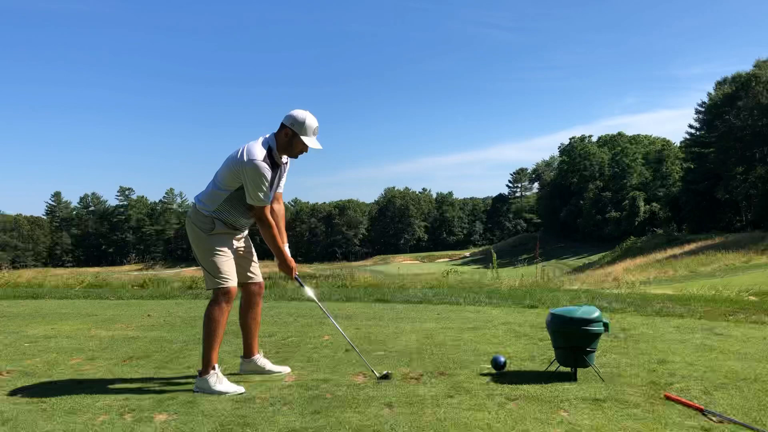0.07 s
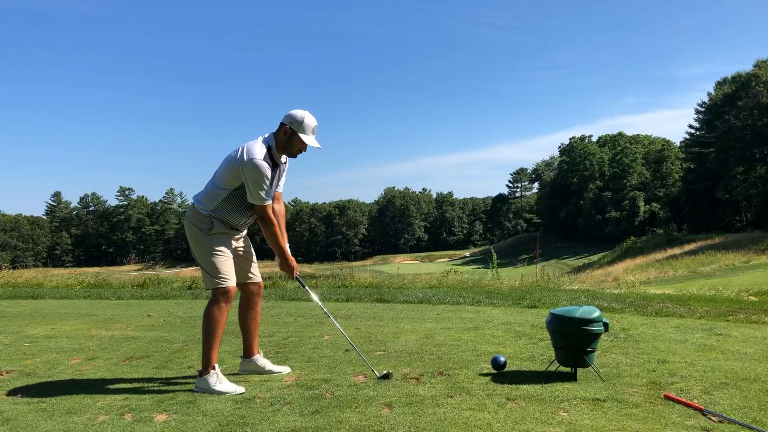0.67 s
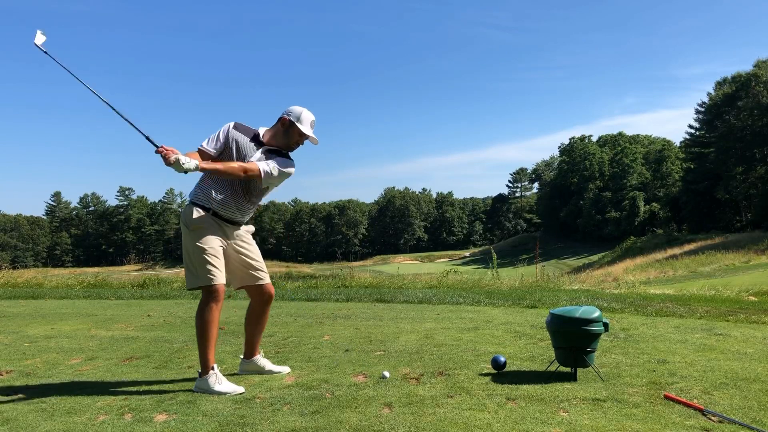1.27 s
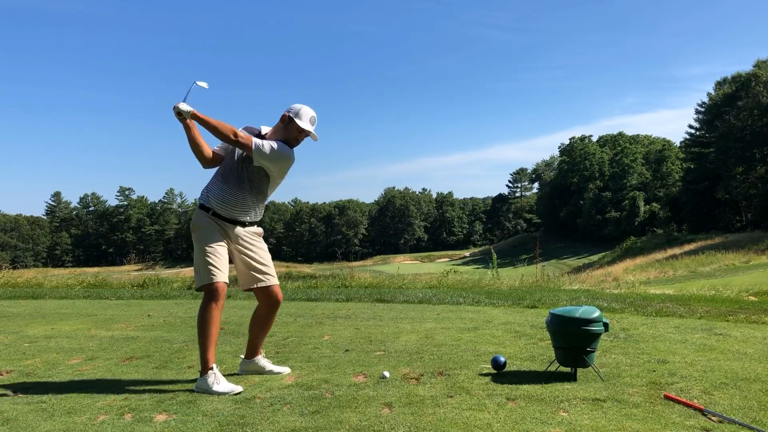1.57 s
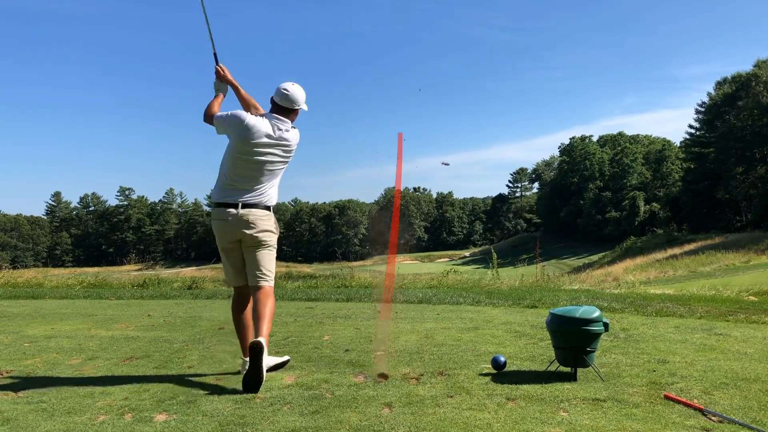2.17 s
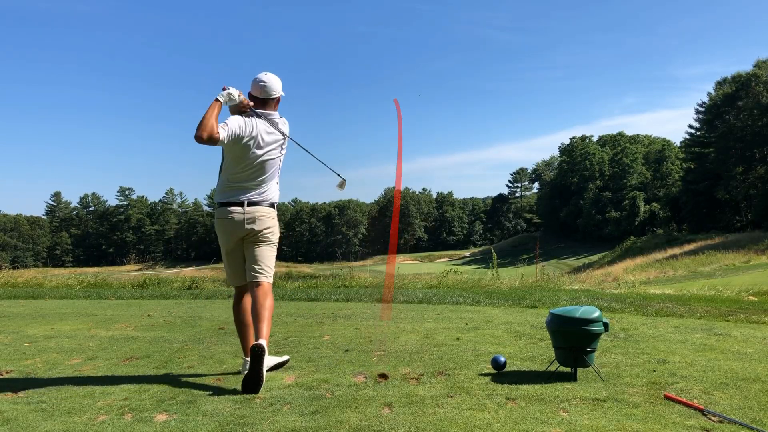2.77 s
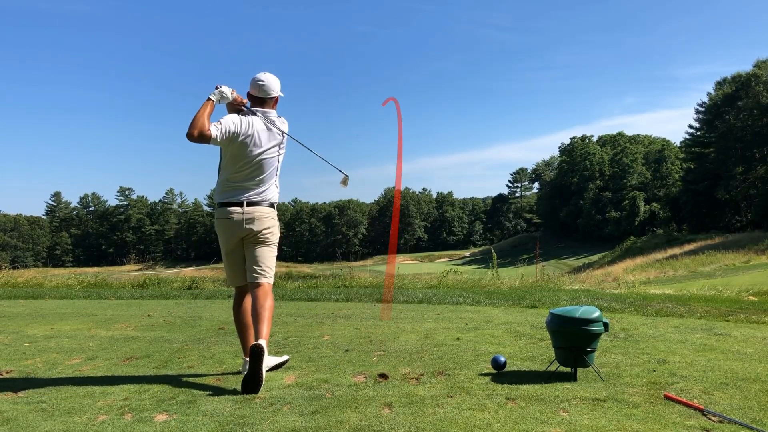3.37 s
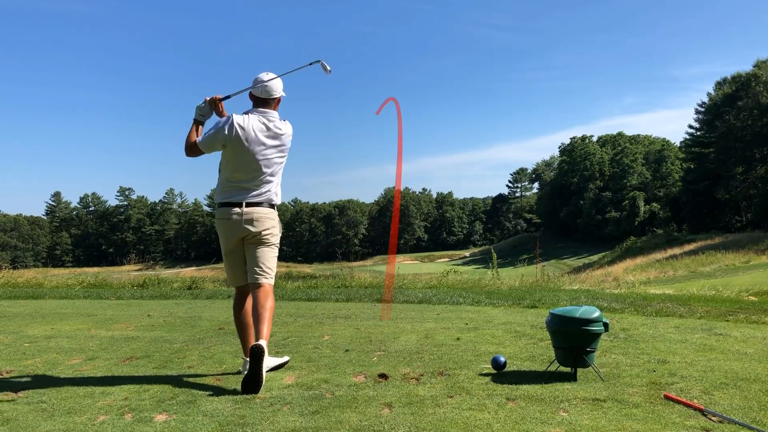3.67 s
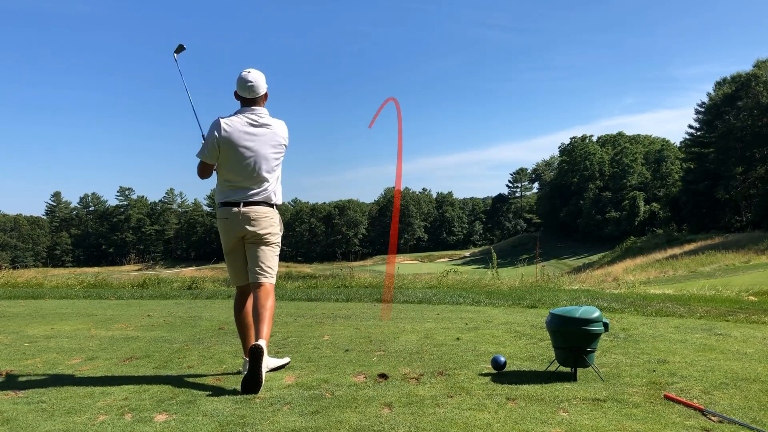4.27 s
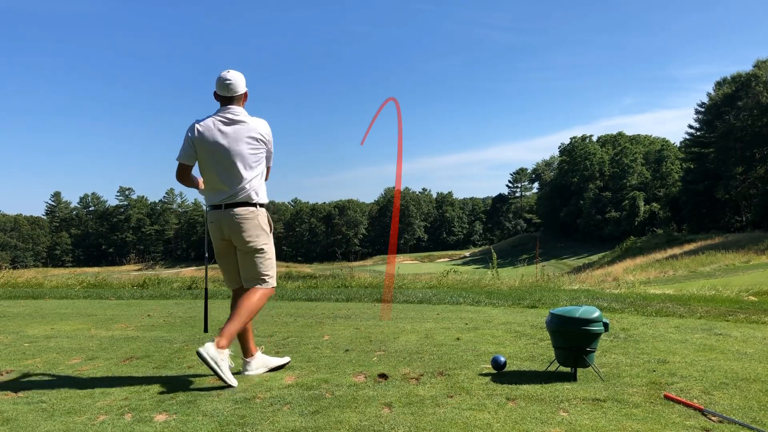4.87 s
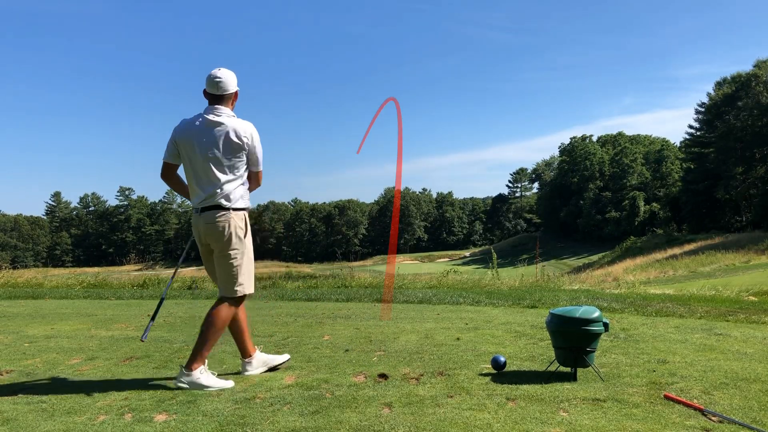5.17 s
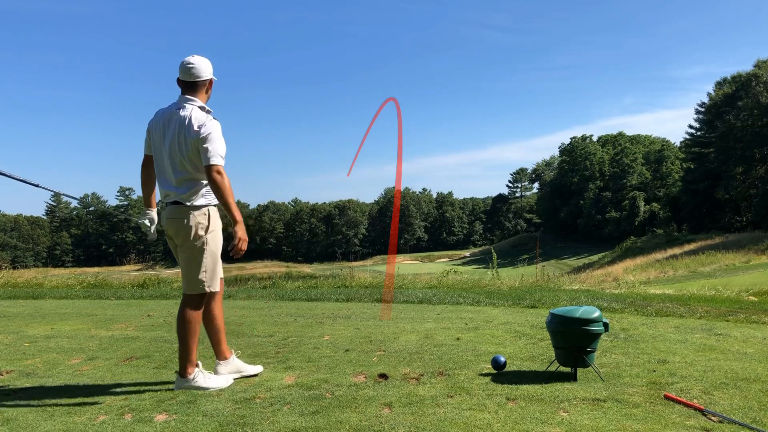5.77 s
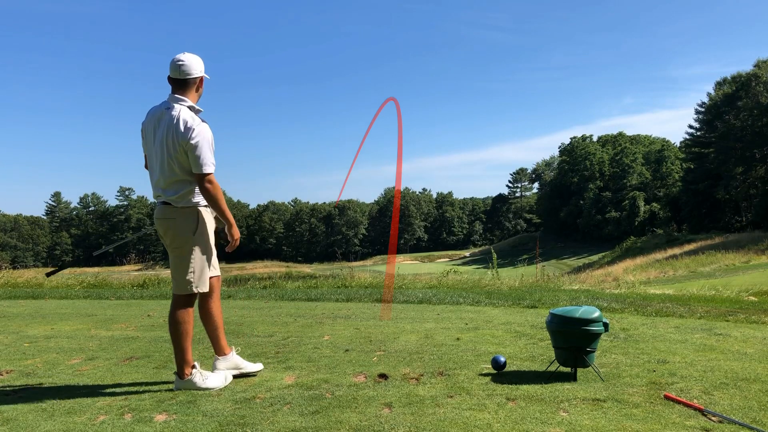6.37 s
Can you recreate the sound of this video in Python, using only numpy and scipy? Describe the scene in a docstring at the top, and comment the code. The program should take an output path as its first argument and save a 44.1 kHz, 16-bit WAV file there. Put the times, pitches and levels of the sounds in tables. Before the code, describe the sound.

A light, low wind rumble on the microphone runs throughout at an outdoor golf tee, with a soft hush of leaves, a faint wavering hum from a distant mower and a barely audible high insect trill. Clothes rustle faintly from about 1.4 seconds. At 2 seconds an iron swishes quickly through the air and, just before 2.1 seconds, hits the ball with one sharp, bright crack and a low thump of tearing turf, by far the loudest moment. Grass and sand spray briefly, a few crumbs of soil tick down around 2.4 seconds, and a soft echo from the slopes and trees fades by about 3 seconds. Quiet clothing rustle follows, with a muffled step, scuff and small clicks near 4.4 seconds and another soft step near 6.3 seconds. Faint, distant birds call around 1.3 seconds and now and then from 5 seconds until the end, at about 6.5 seconds.

```python
"""A light wind rumbles first, with a far mower, birds, leaves and a thin insect trill around a golf tee.
About two seconds in, a golfer swings an iron: the shaft swishes through the air, the club face cracks
on the ball and the ground thumps as the blade tears the turf. Grass and sand spray, and the slopes and
the tree line answer with an echo. Then clothes rustle and feet shift as the golfer steps back."""
import sys
import numpy as np
from scipy import signal
from scipy.fft import rfft, irfft, next_fast_len
from scipy.io import wavfile

SR = 44100
rng = np.random.default_rng(int(sys.argv[2]) if len(sys.argv) > 2 else 0)


def output_pcm(signal):
    """Save a mono or channel-first signal as 16-bit PCM at the path in sys.argv[1].

    Samples are clipped to [-1, 1] before scaling.
    """
    pcm = np.clip(np.atleast_2d(signal).T, -1, 1) * 32767
    wavfile.write(sys.argv[1], SR, np.round(pcm).astype(np.int16))


N = 287091
TIME = np.arange(N) / SR
# when the blade meets the turf, the face meets the ball and the ground gives way
BITE_S, SMACK_S, THUMP_S = 2.066806, 2.069477, 2.0705
# A "rise" or "fall" is the time a level takes to change by 20 dB. A "colour" is the tone of a noise.

# colours of wind rumble, low flutter, and far land and leaves: (frequency [Hz], relative level [dB])
RUMBLE_COLOUR = [(20, -36), (35, -20), (55, 0.5), (75, 1), (110, -.5), (165, -6), (230, -18), (400, -32.5),
                 (1500, -70)]
FLUTTER_COLOUR = [(80, -20), (165, 3), (260, -3), (360, -4), (600, -15), (1500, -24), (5000, -50)]
HUSH_COLOUR = [(120, -31), (200, -2), (273, -4.5), (373, -6), (647, -9), (709, -8.5), (1100, -9.5),
               (2650, -22), (7830, -30.5), (8900, -32), (14600, -35.5), (16000, -48.5)]
# low flutter from wind gusts and, at 4.44 s and 6.33 s, from the golfer moving:
# (peak time [s], level [dB], rise [s])
FLUTTER_SWELLS = [(.15, -64, 0.67), (.75, -69, .4), (1.08, -60, .32), (1.29, -57.5, 0.19),
                  (1.71, -58.5, 0.26), (2.4, -71, .4), (4.44, -70, 0.17), (6.33, -64, .1)]
# steady tones of the mower: (multiple of the engine pitch, level [dB], waver [dB])
MOWER_TONES = [(.494, -71, 4), (1, -71, 1.8), (1.47, -83, 3), (3.31, -82, 3), (4.01, -85, 3)]
# the mower's tone one octave up, which comes and goes: (time [s], level [dB])
MOWER_OCTAVE = [(0, -78), (0.7, -80), (1.2, -72), (1.45, -78.5), (2.3, -71), (3.6, -73.5), (4.07, -82),
                (4.4, -71.5), (4.85, -76), (5.0, -71.5), (5.7, -70.5), (5.95, -77), (6.1, -72), (6.51, -74)]
# far bird calls, plus one long, soft, high rustle of leaves at 3.35 s:
# (time [s], length [s], start pitch [Hz], end pitch [Hz], blur [Hz], level [dB])
BIRDS_AND_LEAVES = [(1.21, 0.081, 2260, 2170, 60, -79), (1.31, .065, 2210, 2130, 60, -76),
                    (3.351, 0.77, 4210, 4090, 1200, -80.5), (4.88, 0.27, 2890, 2810, 500, -79),
                    (5.04, 0.26, 2600, 2520, 450, -77.5), (5.365, 0.033, 3750, 3620, 300, -76.5),
                    (5.69, 0.085, 3900, 3700, 700, -78), (6.264, .03, 4850, 4800, 160, -73),
                    (6.285, .04, 4750, 4600, 250, -77), (6.379, .04, 2300, 2200, 300, -71),
                    (6.44, .05, 2400, 2250, 500, -74), (6.493, 0.033, 4900, 5150, 800, -67.5)]

# body turns, scuffs of sleeves and soles, and steps on turf: (peak time [s], level [dB], rise [s])
TURNS = [(1.4, -74, 0.54), (1.98, -73, .3), (2.6, -77.5, 0.83), (3.25, -79.5, 0.89), (3.75, -85, .6),
         (4.45, -79, .25), (4.98, -76.5, 0.46), (5.48, -76.5, 0.18), (5.76, -81, .4), (6.12, -78.5, 0.71),
         (6.51, -71, 0.22)]
SCUFFS = [(1.635, -67, 0.068), (3.6, -81, 0.49), (4.43, -67, 0.08), (5.28, -75, 0.78), (6.325, -64, 0.097),
          (6.46, -68.5, 0.18)]
TREADS = [(4.415, -65, .06), (4.49, -66, .05), (6.322, -59.5, 0.035)]
# colours of rustling cloth, dull scuffs and muffled steps: (frequency [Hz], relative level [dB])
CLOTH_COLOUR = [(500, -2), (1500, -1), (3500, 0.5), (5500, -3.5), (8000, -4), (12000, -7), (16000, -12)]
SCUFF_COLOUR = [(300, 0), (600, -3), (950, 1.5), (1700, -4), (2250, -6.5), (2700, -12), (3200, -7),
                (4700, -10.5), (5600, -20.5), (12000, -32.5)]
TREAD_COLOUR = [(200, 5), (400, -7), (950, -2), (1400, -12), (3000, -26), (9000, -45)]
# soft bumps of loose turf, hands and heel: (time [s], pitch [Hz], level [dB], time to peak [s])
BUMPS = [(2.092, 69, -36.5, 0.012), (2.089, 225, -44, .008), (2.072, 48, -39, .011),
         (2.073, 305, -41, 0.0075), (2.121, 140, -46, 0.01), (4.39, 194, -58.5, .025),
         (4.44, 200, -55.5, .02), (6.30, 149, -52.5, 0.024), (6.305, 222, -50.5, 0.019)]
# soil crumbs landing, ticks of shoe and grip: (time [s], level [dB], pitch [Hz], time to fade 60 dB [s])
TICKS = [(1.879, -59, 9450, 0.024), (2.284, -64.5, 12050, 0.0087), (2.326, -62, 12980, 0.0081),
         (2.355, -59, 12000, .008), (2.4063, -49, 7900, 0.009), (2.411, -66, 9000, .02),
         (2.417, -59.5, 9000, .008), (3.239, -66.5, 8500, .04), (4.431, -58, 2300, .018),
         (4.456, -59, 5800, .04), (4.463, -64, 10000, .08), (4.467, -59, 5500, .02),
         (4.472, -54.5, 6800, .015), (4.475, -53, 3320, 0.018), (4.4903, -50, 1960, 0.011),
         (4.491, -56, 3000, .01), (4.533, -66.5, 12500, .05), (4.542, -62, 10500, .025),
         (4.552, -63, 12000, .014), (4.732, -62, 7460, .1), (5.036, -64, 3600, 0.04)]

# echoes from the near slopes, then the tree line: (delay [s], level [dB], rise [s], hold [s], fall [s])
ECHOES = [(.06, -55.5, .08, 0.079, 0.14), (.24, -64, .2, 0.033, 0.74)]
# colours of the echoes, fine grass shreds and flying soil: (frequency [Hz], relative level [dB])
ECHO_COLOUR = [(200, -3.5), (450, -4), (900, -.5), (1450, 0), (2200, -3.5), (2750, -7), (3600, -5.5),
               (7000, -18), (16000, -29)]
SHREDS_COLOUR = [(7000, -4), (9400, 1), (12000, -3), (16000, -5)]
SPRAY_COLOUR = [(190, 5), (300, 1.5), (480, -16), (1000, -11), (1500, -5), (2300, -4.5), (2750, -9.5),
                (3500, -2), (5000, -3), (6500, -6), (8000, -12), (9500, -11), (12000, -18), (16000, -23.5)]
# colours of the air behind shaft and head, and of tearing grass: (frequency [Hz], relative level [dB])
SHAFT_WAKE_COLOUR = [(600, -6), (950, 0), (1700, -8), (4000, -25), (12000, -36)]
HEAD_WAKE_COLOUR = [(200, -1), (700, 2), (1500, -1), (2200, -4), (4000, -5.5), (6000, -11), (9000, -14),
                    (12500, -20.5), (16000, -26.5)]
TEAR_COLOUR = [(300, 0), (700, 1), (1500, 1), (2400, -1), (4000, -3), (5500, 1), (7600, -3), (10000, 0),
               (13500, -3), (16000, -5)]
# hollow knock of head and ball, bright smack of the face and faint after-ring of the steel:
# (pitch [Hz], level [dB], time to peak [s])
KNOCK_TONES = [(465, -25.4, .00428), (715, -29.5, .0042), (870, -22.2, .00332), (1244, -23.9, .00354),
               (1556, -27.7, .00378), (1752, -21.8, .00272), (2145, -22.0, .00326), (2957, -18.7, .00213),
               (3298, -25.2, .0036), (3630, -26.0, .00271), (4215, -25.6, .00242), (4631, -34.9, .00405),
               (5062, -29.3, .00347), (5574, -32.9, .00378), (5948, -34.1, .00367), (6548, -26.3, .00344),
               (8362, -27.2, .00275), (8922, -29.5, .00347), (13244, -32.2, .00288)]
SMACK_TONES = [(3723, -14.2, .0006), (5870, -9.8, .0004), (9302, -5.9, .00035), (12233, -13.1, .00041),
               (14890, -21.8, .00053)]
STEEL_TONES = [(2388, -46, 0.0074), (9190, -63.5, 0.04)]


def from_db(db):
    """Turn decibels into a gain, the number a sound is multiplied by."""
    return 10 ** (np.asarray(db) / 20)


def rms_one(x):
    """Scale a sound so that its average strength (rms) is 1."""
    return x / np.sqrt(np.mean(x ** 2) + 1e-20)


def wander(rate_hz):
    """A random drift of roughly 1 either way that heads for a new value rate_hz times a second."""
    targets = rng.standard_normal(4096)
    return np.interp(TIME * rate_hz, np.arange(len(targets)), targets)


def swell(peak_s, db, rise_s, fall_s, hold_s=0):
    """A gain that climbs to its peak, holds and dies away, evenly in dB."""
    before = np.maximum(peak_s - TIME, 0)
    after = np.maximum(TIME - peak_s - hold_s, 0)
    return from_db(db - 20 * np.minimum(before / rise_s + after / fall_s, 10))


def swells(rows, fall_ratio):
    """The joint gain of several swells, each taking fall_ratio times as long to fall as to rise."""
    return np.sqrt(sum(swell(s, db, rise_s, fall_ratio * rise_s) ** 2 for s, db, rise_s in rows))


def noise(colour, grain_db=0):
    """Noise of a given colour and rms 1; grain makes each millisecond louder or softer by chance."""
    grain_times = TIME[::44]
    grains = np.interp(TIME, grain_times, rng.standard_normal(len(grain_times)))
    white = rng.standard_normal(N) * from_db(grain_db * grains)
    hz, db = np.transpose(colour)
    size = next_fast_len(N)
    bins_hz = np.arange(size // 2 + 1) * SR / size + 1e-3
    gain = from_db(np.interp(np.log(bins_hz), np.log(hz), db))
    gain *= np.minimum(bins_hz / hz[0], 1) ** 2  # fade out below the colour's lowest frequency
    return rms_one(irfft(rfft(white, size) * gain, size)[:N])


def resonate(x, hz, width_hz):
    """Make a sound ring around one pitch; a narrower width rings longer."""
    r = np.exp(-np.pi * width_hz / SR)
    return signal.lfilter([1, 0, -1], [1, -2 * r * np.cos(2 * np.pi * hz / SR), r * r], x)


def struck(start_s, tones):
    """The tones of a hit: they build up while the contact lasts and die almost as quickly."""
    out = np.zeros(N)
    on = (TIME > start_s) & (TIME < start_s + .5)
    t = TIME[on] - start_s
    for hz, db, peak_s in tones:
        age = t / peak_s
        out[on] += from_db(db) * (age * np.exp(1 - age)) ** 3 * np.sin(2 * np.pi * hz * t)
    return out


def wind():
    """A breeze on the microphone makes a rumble that slowly builds and eases."""
    return swell(peak_s=1.03, db=-58, rise_s=8, fall_s=12, hold_s=3.4) * noise(RUMBLE_COLOUR)


def flutter():
    """A faint, low flutter that swells with wind gusts and, twice near the end, as the golfer moves."""
    return np.hypot(from_db(-81), swells(FLUTTER_SWELLS, fall_ratio=1.32)) * noise(FLUTTER_COLOUR)


def hush():
    """Distant land and leaves give a soft, even noise."""
    return from_db(-64.5) * noise(HUSH_COLOUR)


def insects():
    """Insects make a thin trill, heard as a narrow band of high noise."""
    return from_db(-89.5) * rms_one(resonate(rng.standard_normal(N), hz=8700, width_hz=310))


def mower(engine_hz=326.3):
    """A far engine holds its speed while the moving air makes each of its tones waver."""
    phase = 2 * np.pi * np.cumsum(engine_hz + 1.3 * wander(6)) / SR
    octave_db = np.interp(TIME, *np.transpose(MOWER_OCTAVE)) + 1.4 * wander(5)
    hum = from_db(octave_db) * np.sin(2 * phase)
    for multiple, db, waver_db in MOWER_TONES:
        hum += from_db(db + waver_db * wander(5)) * np.sin(multiple * phase)
    return hum


def birds_and_leaves():
    """Gliding bands of noise: far bird calls blurred by the trees, and one long, soft rustle of leaves."""
    out = np.zeros(N)
    for start_s, length_s, start_hz, end_hz, blur_hz, db in BIRDS_AND_LEAVES:
        on = (TIME > start_s) & (TIME < start_s + length_s)
        progress = (TIME[on] - start_s) / length_s
        phase = 2 * np.pi * np.cumsum(start_hz + (end_hz - start_hz) * progress) / SR
        lowpass = signal.butter(2, blur_hz / 2, fs=SR, output="sos")
        blur = signal.sosfilt(lowpass, rng.standard_normal((2, SR)))[:, :len(progress)]
        band = rms_one(blur[0] * np.cos(phase) + blur[1] * np.sin(phase))
        out[on] += from_db(db) * np.sin(np.pi * progress) * band
    return out


def golfer():
    """Clothes and shoes rub, soles press the grass flat, and loose turf, hands and heel bump softly."""
    cloth = swells(TURNS, fall_ratio=1.6) * noise(CLOTH_COLOUR, grain_db=2)
    scuffs = swells(SCUFFS, fall_ratio=2.64) * noise(SCUFF_COLOUR, grain_db=2.5)
    treads = swells(TREADS, fall_ratio=1.4) * noise(TREAD_COLOUR, grain_db=3.5)
    bumps = sum(struck(start_s, [tone]) for start_s, *tone in BUMPS)
    return cloth + scuffs + treads + bumps


def ticks(broad_above_hz=5500):
    """Soil crumbs, shoes and grip tick: dying puffs of noise, the low ones with a clearer pitch."""
    out = np.zeros(N)
    t = TIME[:SR // 5]
    for start_s, db, hz, fade_s in TICKS:
        puff = rng.standard_normal(len(t)) * from_db(-60 * t / fade_s)
        tick = resonate(puff, hz, width_hz=.45 * hz * min(hz / broad_above_hz, 1))
        first = int(start_s * SR)
        out[first:first + len(t)] += from_db(db) * tick / np.abs(tick).max()
    return out


def echoes():
    """The slopes and the tree line scatter the crack, so it comes back as a wash of noise."""
    power = sum(swell(SMACK_S + delay_s, db, rise_s, fall_s, hold_s) ** 2
                for delay_s, db, rise_s, hold_s, fall_s in ECHOES)
    return np.sqrt(power) * noise(ECHO_COLOUR, grain_db=.98)


def sand(grains_per_s=1500, low_hz=4340, high_hz=6300):
    """Sand patters on the grass in a short shower, each grain a tiny click at one of eight pitches."""
    clicks = (rng.random(N) < grains_per_s / SR) * rng.standard_normal(N)
    pitch_choice = rng.integers(0, 8, N)
    patter = sum(resonate(clicks * (pitch_choice == k) + 1e-18, hz, width_hz=260)
                 for k, hz in enumerate(np.geomspace(low_hz, high_hz, 8)))
    return swell(SMACK_S + .054, db=-55, rise_s=.025, fall_s=.091, hold_s=.037) * rms_one(patter)


def flying_turf():
    """The cut turf flies apart: fine shreds hiss at once, then a spray of grass and soil thickens."""
    shreds_gain = swell(SMACK_S, db=-58, rise_s=.0008, fall_s=.1, hold_s=.04)
    shreds = shreds_gain * noise(SHREDS_COLOUR, grain_db=3)
    spray = swell(SMACK_S + .062, db=-52, rise_s=.14, fall_s=.17) * noise(SPRAY_COLOUR, grain_db=2.5)
    return shreds + spray


def swish(fastest_s=2.065, speed_up_s=.1, top_hz=631):
    """The shaft sheds swirls of air that sing higher as it moves faster; the head drags a hissing wake."""
    speed = 1 / np.sqrt(1 + 3 * ((TIME - fastest_s) / speed_up_s) ** 2)  # from 0.5 to 1 in speed_up_s
    phase = 2 * np.pi * np.cumsum(top_hz * speed) / SR + 1.5 * wander(330)
    tone = rms_one(np.sin(phase) * from_db(4 * wander(160)))
    wake = from_db(-9.5) * noise(SHAFT_WAKE_COLOUR)
    # the shaft sweeps past first, then the head
    shaft = swell(peak_s=2.026, db=-47, rise_s=.075, fall_s=.11) * (tone + wake)
    head = swell(peak_s=2.046, db=-42, rise_s=.05, fall_s=.04) * noise(HEAD_WAKE_COLOUR)
    return shaft + head


def thump(start_hz=321, end_hz=65.4, sink_s=.008):
    """The ground gives way under the blade: one low pulse that sinks in pitch as the head slows."""
    age = np.maximum(TIME - THUMP_S, 0)
    hz = end_hz + (start_hz - end_hz) * np.exp(-age / sink_s)
    phase = 2 * np.pi * np.cumsum(hz * (age > 0)) / SR
    return swell(THUMP_S + .0105, db=-23, rise_s=.02, fall_s=.015) * np.sin(phase)


def strike():
    """The club hits: knock, smack and thump follow within milliseconds while the blade tears the grass."""
    crack = struck(BITE_S, KNOCK_TONES) + struck(SMACK_S, SMACK_TONES) + struck(SMACK_S, STEEL_TONES)
    tear = swell(BITE_S, db=-35.5, rise_s=.0008, fall_s=.0055, hold_s=.0066) * noise(TEAR_COLOUR)
    return crack + thump() + tear


def scene():
    """The golf shot and its surroundings, added together in one channel."""
    shot = swish() + strike()
    aftermath = (TIME > SMACK_S) * (flying_turf() + sand() + echoes())
    small_sounds = ticks() + golfer()
    background = insects() + wind() + flutter() + hush() + mower() + birds_and_leaves()
    return (shot + aftermath + small_sounds + background)[None]


def record(dry, start_s=.036, peak_limit=.85, cutoff_hz=16300):
    """Start after a moment of silence, clip any peak over the limit and cut the highest treble steeply."""
    clipped = np.clip(dry * (TIME >= start_s), -peak_limit, peak_limit)
    lowpass = signal.ellip(10, .1, 80, cutoff_hz, fs=SR, output="sos")
    return signal.sosfilt(lowpass, clipped)


dry = scene()
out = record(dry)
output_pcm(out)
```